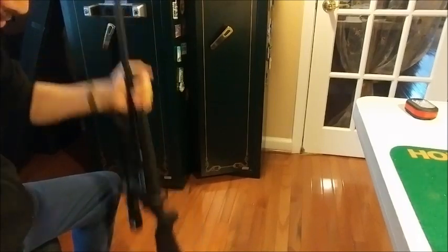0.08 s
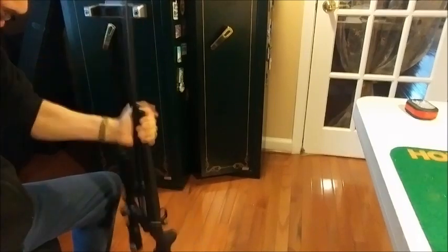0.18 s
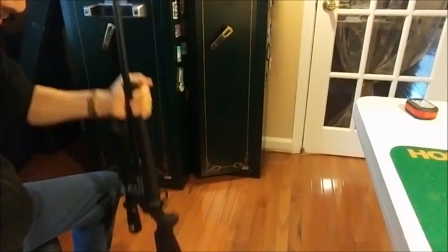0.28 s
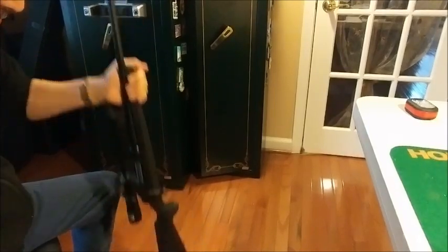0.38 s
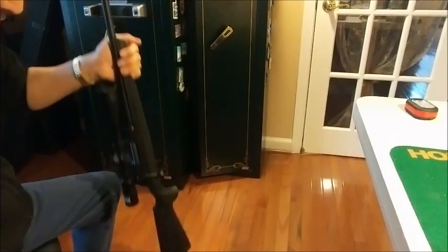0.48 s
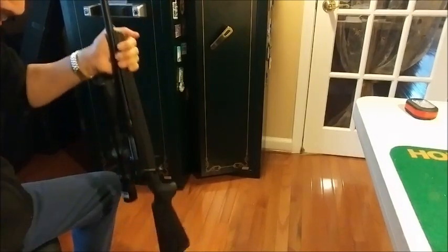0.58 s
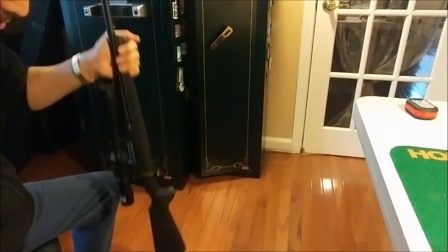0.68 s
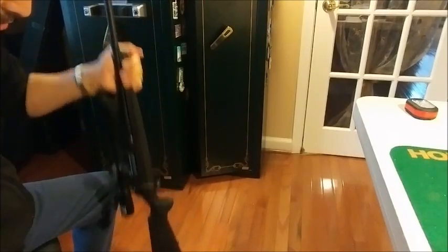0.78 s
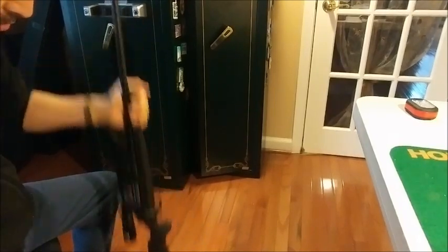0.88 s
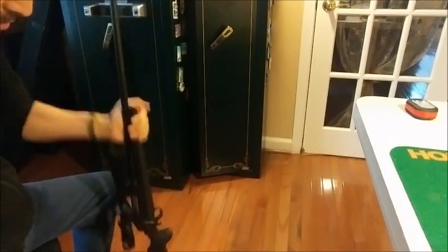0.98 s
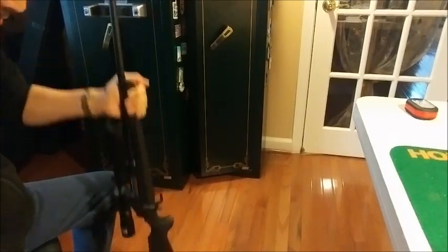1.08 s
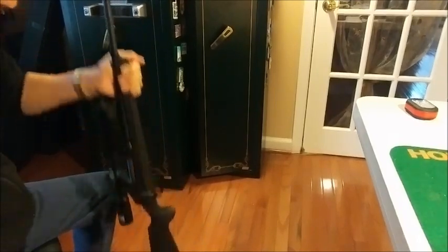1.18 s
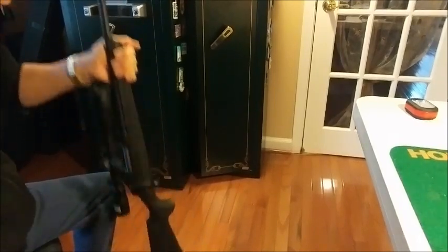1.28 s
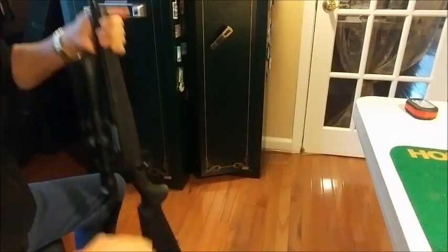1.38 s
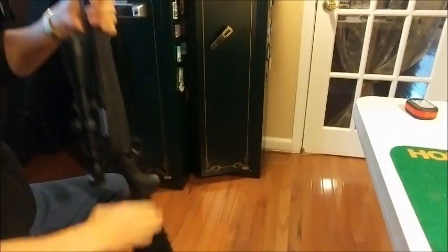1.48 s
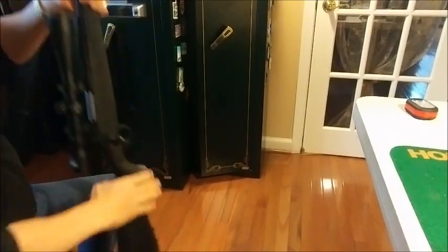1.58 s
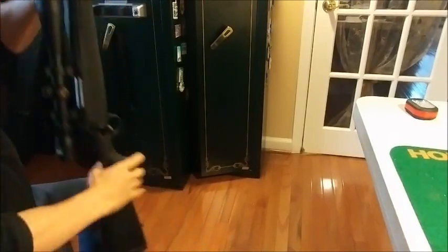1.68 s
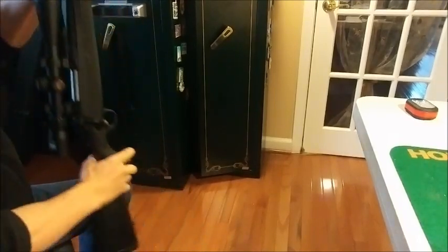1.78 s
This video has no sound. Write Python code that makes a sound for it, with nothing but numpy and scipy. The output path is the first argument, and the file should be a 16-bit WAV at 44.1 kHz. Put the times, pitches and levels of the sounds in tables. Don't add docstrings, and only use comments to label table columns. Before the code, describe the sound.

A rifle butt thumps hard on a hardwood floor at about 0.2 seconds and again at 1.0. Each blow is a woody knock with a deep, wavering floor boom, and loose metal clacks and chatters while a steel panel rings briefly. The small room blurs it. Around 1.35 a hand slides faintly along the stock, then soft shuffles at 1.5-1.7 over low rumble, close microphone.

```python
import sys
import numpy as np
from scipy import signal
from scipy.fft import rfft, irfft, next_fast_len
from scipy.io import wavfile
from scipy.ndimage import uniform_filter1d

SR = 44100
rng = np.random.default_rng(int(sys.argv[2]) if len(sys.argv) > 2 else 0)


def materialize(psi):
    bounded = np.clip(np.atleast_2d(psi).T, -1, 1)
    quanta = np.round(bounded * 32767).astype(np.int16)
    wavfile.write(sys.argv[1], SR, quanta)


def attenuation_scalar(level_db):
    decades = np.asarray(level_db, float) / 20
    return 10 ** decades


N = 79380

# start_s, boom_db, knock_db, rattle_db
BLOWS = [
    (0.2077, 0.5, 1.5, 3.5),
    (.9800, -1, 3, 3),
]
# pitch_hz, left_db, right_db, t60_s, lag_ms
FLOOR_MODES = [(46.3, -9.5, -16.5, .25, 6.5), (52.54, -26, -36.5, .9, 1.84), (58.18, -6, -11, 0.42, -0.4),
               (68.8, -15, -17.5, .42, -1.5), (70.5, -14.5, -22, 0.37, 3.2),
               (74.4, -36.5, -20.5, 0.27, -4.0), (79.05, -16.5, -23, .25, -0.6),
               (98.8, -11.5, -15, .24, 3.34), (111.1, -11, -16.5, .26, 2.97), (129, -21, -24.5, .35, 1.77),
               (144, -16.5, -34.5, 0.38, 1.85), (165.36, -20, -17.5, 0.42, 4), (186.4, -13, -20, 0.23, 4.4),
               (237.5, -29.5, -32, 0.5, 1.6)]
# pitch_hz, level_db, t60_s
WOOD_MODES = [(245, -8.5, 0.11), (383, -12, 0.16), (564.6, 0, .07), (583, 0, 0.27), (707, -0.5, 0.067),
              (811, -5.5, 0.15), (910, 0.5, 0.09), (1280, -7, 0.017), (2000, -3.5, 0.033), (2600, -13, .02)]
# pitch_hz, level_db, t60_s
METAL_MODES = [(1179, -10, .05), (1475, -10, .05), (1607, -13, .05), (1664, -12, .05), (1912, -9, .05),
               (2041, -9, .05), (2121, -9, .05), (2467, -8, .06), (2955, -9, .05), (4447, -13, .04)]
# start_s, level_db
CLACKS = [(0.229, -3), (0.242, -13), (0.26, -0.5), (0.273, -17.5), (0.293, -35), (0.308, -13.5),
          (0.997, -10), (1.015, 7), (1.033, -4), (1.046, -1.5), (1.066, -6), (1.081, -7)]
# freq_hz, level_db
CLATTER_TONE = [(300, -3.5), (700, -7.5), (1500, -1), (3000, -2.5), (5000, -8), (6500, -8.5), (7800, -6),
                (16000, -15.5)]
# start_s, pitch_hz, level_db, t60_s
PANEL_RINGS = [(.244, 981.4, -8, 0.23), (.256, 986, 0, .28), (0.261, 1060, -6, .1),
               (0.276, 1001, -3, 0.091), (1.017, 1030, -0.5, 0.2), (1.014, 1100, 1, .09),
               (1.015, 1698, -2, 0.11), (1.016, 1931, -6, 0.056), (1.047, 995, -3, .2)]
# freq_hz, t60_s
ROOM_T60 = [(60, 1), (250, 0.69), (700, 0.44), (2000, 0.44), (5000, 0.42), (9000, 0.25), (14000, 0.47)]
# loudest_s, rise_s, fall_s, level_db
SLIDES = [
    (1.358, 0.092, .06, -48.5),
    (1.77, 0.03, .03, -67),
]
# freq_hz, level_db
SLIDE_TONE = [(500, -7.5), (3000, -13.5), (5500, -8.5), (6800, -8.5), (7900, -2.5), (9000, -9.5),
              (16000, -14)]
# start_s, level_db, pitch_hz
SHUFFLES = [
    (0.883, -74, 122.5),
    (1.494, -58, 190),
    (1.539, -54, 203),
    (1.656, -55, 192.3),
    (1.678, -60.5, 240),
]
# freq_hz, level_db
RUMBLE_TONE = [(15, -49.5), (25, -23), (37, -2.5), (140, 1.5), (183, -2), (445, -8.5), (552, -11.5),
               (722, -15), (15500, -38)]
# freq_hz, level_db
MIC_RESPONSE = [(25, -11), (42, -0.5), (8500, -1), (9300, -18), (9700, -57), (11300, -68.5), (11700, -20.5),
                (15000, -18), (15750, -29)]

BOOM_RISE_S, BOOM_DB = 0.025, 4.5
KNOCK_DB, PUSH_S, TICK_DB = -27, 0.00044, -38.5
BOUNCE_S, BOUNCE_DB = 0.016, 0
CLACK_DB, CLACK_S = 6, 0.0015
CHATTER_PER_S, CHATTER_SPREAD_DB = 9000, 1.5
ATTACK_S, HOLD_S, RELEASE_T60_S, RATTLE_START = 0.041, 0.048, 0.15, 0.04
CLATTER_DB, RATTLE_PAN_DB = -15.5, 5.5
RING_DB, RING_SCATTER_DB, RING_LATE_S = -30, 2.0, 0.036
PANEL_DB = -23.5
SCATTER_S, SCATTER_ALIKE_HZ = 0.0015, 600
ROOM_DB, ROOM_BOOM_DB, ROOM_RISE_S = -9, -15, 0.008
SHUFFLE_T60_S = 0.09
AIR_DB, AIR_ALIKE_HZ, AIR_PAN_DB, AIR_FLICKER_DB = -63, 500, 2.5, 2.5
LIMIT = 1.2


def colour(x, points):
    p = np.array(points, float)
    size = next_fast_len(x.shape[-1] + 4096)
    hz = np.arange(size // 2 + 1) * SR / size + 1
    gain = attenuation_scalar(np.interp(np.log(hz), np.log(p[:, 0]), p[:, 1]))
    return irfft(rfft(x, size) * gain, size)[..., :x.shape[-1]]


def level(x, db):
    power = np.mean(np.atleast_2d(x) ** 2, 0)
    return x * attenuation_scalar(db) / np.sqrt(uniform_filter1d(power, SR // 10).max())


def decay(seconds, t60):
    return np.exp(-np.log(1000) * seconds / t60)


def ring(x, hz, t60):
    r = np.exp(-np.log(1000) / (t60 * SR))
    turn = 2 * np.pi * hz / SR
    return signal.lfilter([np.sin(turn)], [1, -2 * r * np.cos(turn), r * r], x)


def pan(db):
    return attenuation_scalar(np.array([[db / 2], [-db / 2]]))


def spikes(times, sizes):
    out = np.zeros(N)
    at = np.clip((np.asarray(times) * SR).astype(int), 0, N - 1)
    np.add.at(out, at, sizes)
    return out


def air():
    mid, side = rng.standard_normal((2, N))
    side = colour(side, [(60, -7), (AIR_ALIKE_HZ, -4), (1400, 0)])
    rumble = colour(np.array([mid + side, mid - side]), RUMBLE_TONE)
    for hz in (60, 120, 240, 480):
        steps = np.repeat(rng.standard_normal(N // 2000 + 1), 2000)[:N]
        walk = uniform_filter1d(steps, 2000)
        band = colour(rumble, [(hz / 2, -40), (hz, 0), (hz * 2, -40)])
        rumble = rumble + band * (attenuation_scalar(AIR_FLICKER_DB * walk) - 1)
    return rumble / rumble.std() * attenuation_scalar(AIR_DB) * pan(AIR_PAN_DB)


def knock():
    hits = spikes([b[0] for b in BLOWS], [attenuation_scalar(b[2]) for b in BLOWS])
    bounce = attenuation_scalar(BOUNCE_DB) * np.roll(hits, int(BOUNCE_S * SR))
    push = np.convolve(hits + bounce, np.hanning(int(PUSH_S * SR) + 3))[:N]
    wood = 0
    for k, (hz, db, t60) in enumerate(WOOD_MODES):
        wood = wood + (-1) ** k * attenuation_scalar(db) * ring(push, hz, t60)
    grit = rng.standard_normal(400) * np.exp(-np.arange(400) / 60)
    tick = np.convolve(hits, grit)[:N]
    return level(wood, KNOCK_DB) + attenuation_scalar(TICK_DB) * 4 * tick


def boom(t):
    out = np.zeros((2, N))
    for at, blow_db, _, _ in BLOWS:
        u = np.maximum(t - at, 0)
        rise = 1 - np.exp(-(u / BOOM_RISE_S) ** 2)
        for hz, left_db, right_db, t60, lag_ms in FLOOR_MODES:
            swing = np.sin(2 * np.pi * hz * (u - lag_ms / 1000)) * decay(u, t60)
            gains = attenuation_scalar(np.array([[left_db], [right_db]]) + blow_db + BOOM_DB)
            out += gains * swing * rise
    return out


def rattle(t):
    clacks = spikes([c[0] for c in CLACKS], attenuation_scalar(np.array(CLACKS)[:, 1] + CLACK_DB))
    puff = 1 + np.convolve(clacks, np.exp(-np.arange(900) / (CLACK_S * SR)))[:N]
    clatter, rung = 0, 0
    for at, _, _, blow_db in BLOWS:
        u = t - at
        attack = (RATTLE_START + np.clip(u / ATTACK_S, 0, 1)) * (u > 0)
        env = attack * decay(np.maximum(u - ATTACK_S - HOLD_S, 0), RELEASE_T60_S)
        contacts = rng.random(N) < CHATTER_PER_S / SR
        spread = attenuation_scalar(CHATTER_SPREAD_DB * rng.exponential(size=N))
        chatter = contacts * rng.standard_normal(N) * spread
        shake = chatter * puff * env * attenuation_scalar(blow_db)
        clatter = clatter + shake
        late = shake * np.clip(u / RING_LATE_S, 0, 1) ** 2
        luck = rng.standard_normal(len(METAL_MODES))
        for k, (hz, db, t60) in enumerate(METAL_MODES):
            gain = attenuation_scalar(db + RING_SCATTER_DB * luck[k]) / np.sqrt(t60)
            rung = rung + gain * ring(late, hz, t60)
    return level(colour(clatter, CLATTER_TONE), CLATTER_DB) + level(rung, RING_DB)


def panel():
    steel = 0
    for at, hz, db, t60 in PANEL_RINGS:
        steel = steel + attenuation_scalar(db) * ring(spikes([at], [1.0]), hz, t60)
    return level(steel, PANEL_DB)


def scatter(x):
    echoes = rng.standard_normal((2, 1500)) * np.exp(-np.arange(1500) / (SCATTER_S * SR))
    spectrum = rfft(echoes)
    flat = irfft(spectrum / np.abs(spectrum))[:, :900]
    own = signal.fftconvolve(x[None], flat, axes=1)[:, :N]
    return own + colour(x - own, [(SCATTER_ALIKE_HZ, 0), (SCATTER_ALIKE_HZ * 3, -40)])


def room(x):
    t = np.arange(SR) / SR
    p = np.array(ROOM_T60)
    tail = 0
    for hz in 45 * 2 ** np.arange(0, 8.6, 0.5):
        sos = signal.butter(2, [hz / 1.19, hz * 1.19], "band", fs=SR, output="sos")
        band = signal.sosfilt(sos, rng.standard_normal((2, SR)))
        t60 = np.interp(np.log(hz), np.log(p[:, 0]), p[:, 1])
        tail = tail + band * attenuation_scalar(-60 * t / t60)
    tail[1] += colour(tail[0] - tail[1], [(150, -2), (900, -20)])
    tail = tail * (1 - np.exp(-t / ROOM_RISE_S))
    tail = tail / np.sqrt(np.sum(tail ** 2) / 2)
    return signal.fftconvolve(x[None], tail, axes=1)[:, :N]


def hand(t):
    env, low = 0, 0
    for at, rise, fall, db in SLIDES:
        env = env + attenuation_scalar(db) * np.exp(-((t - at) / np.where(t < at, rise, fall)) ** 2)
    hiss = colour(rng.standard_normal((2, N)), SLIDE_TONE)
    for at, db, hz in SHUFFLES:
        low = low + attenuation_scalar(db) * ring(spikes([at], [1.0]), hz, SHUFFLE_T60_S)
    return env * hiss / hiss.std() * pan(4.6) + 2 * low * pan(2.6)


def scene():
    t = np.arange(N) / SR
    rumble = air()
    near = knock() + rattle(t)
    low, steel = boom(t), panel()
    upper_boom = attenuation_scalar(ROOM_BOOM_DB) * colour(low[0], [(75, -22.5), (110, 0)])
    tail = attenuation_scalar(ROOM_DB) * room(near + steel + upper_boom)
    loud = low + (scatter(near) + steel + tail) * pan(RATTLE_PAN_DB)
    rounded = LIMIT * np.tanh(loud / LIMIT)
    return colour(rounded + hand(t), MIC_RESPONSE) + rumble


def roll_off(x):
    return signal.sosfilt(signal.butter(12, 15760, fs=SR, output="sos"), x)


def record(dry):
    hole = signal.butter(8, (9300, 11550), "band", fs=SR, output="sos")
    bright = colour(dry[0], [(3000, -60), (5000, 0)])
    is_bright = uniform_filter1d(bright ** 2, 1024) > attenuation_scalar(2 * -60)
    fade = uniform_filter1d(1.0 * is_bright, 256)
    mix = dry - fade * signal.sosfiltfilt(hole, dry)
    return roll_off(mix)


dry = scene()
out = record(dry)
materialize(out)
```